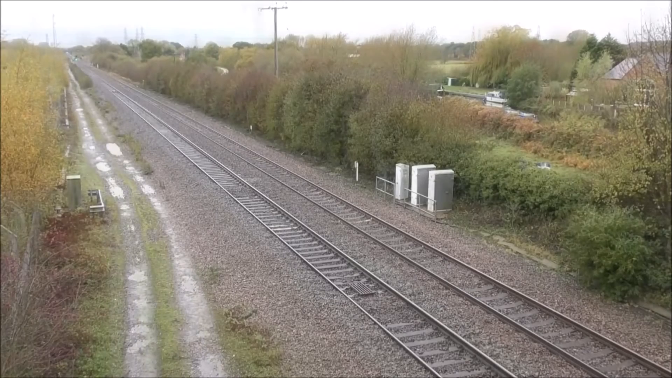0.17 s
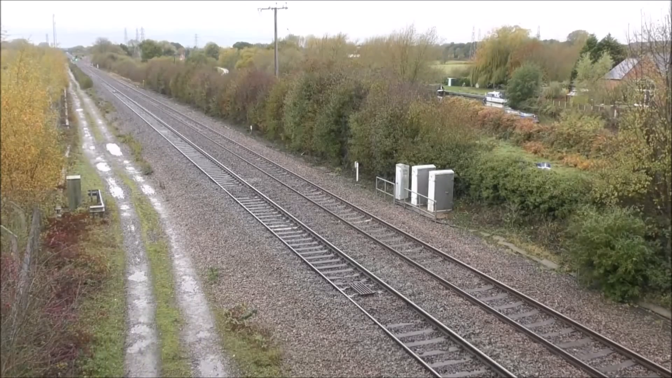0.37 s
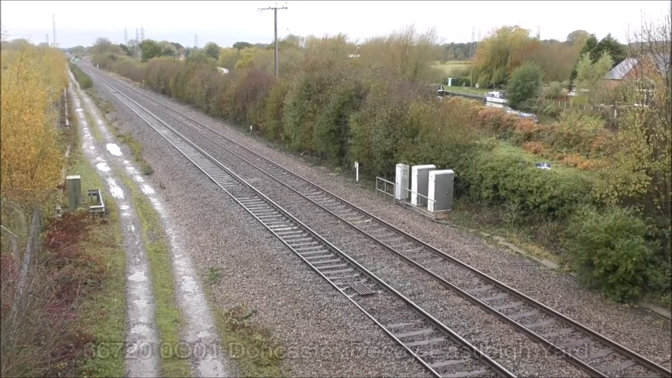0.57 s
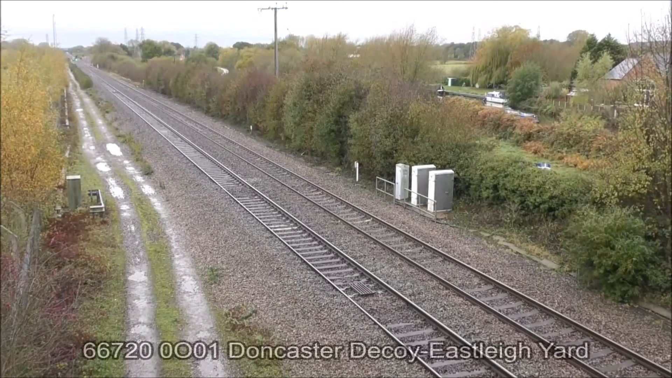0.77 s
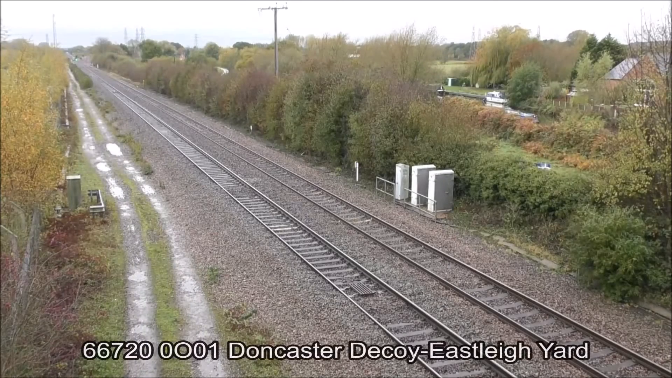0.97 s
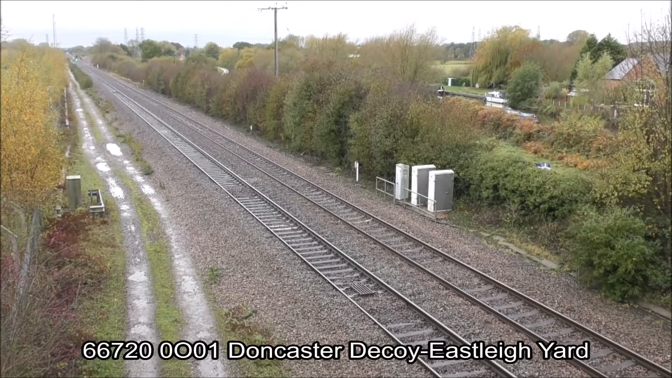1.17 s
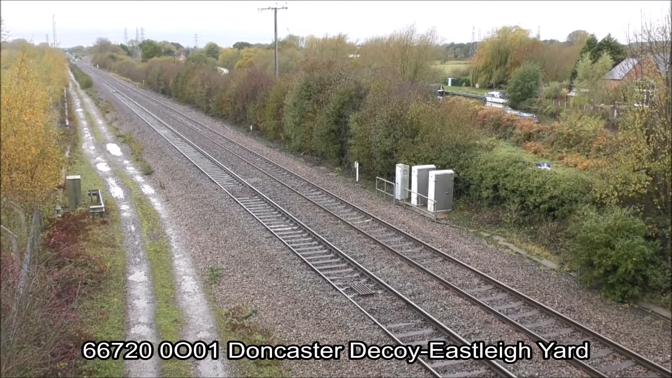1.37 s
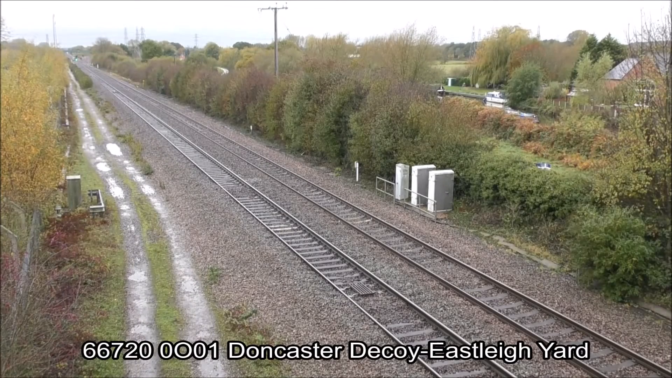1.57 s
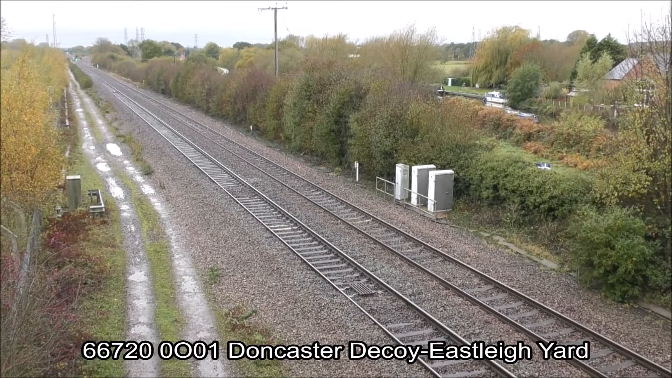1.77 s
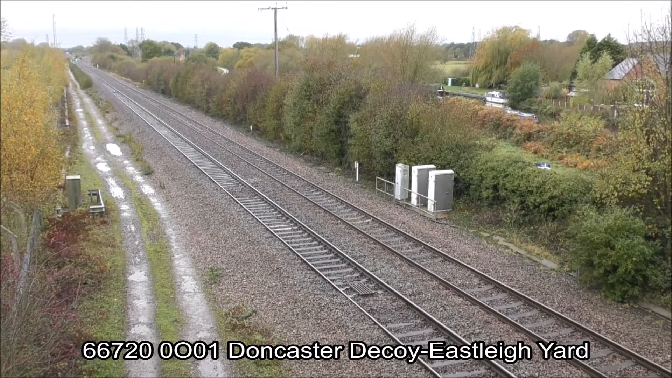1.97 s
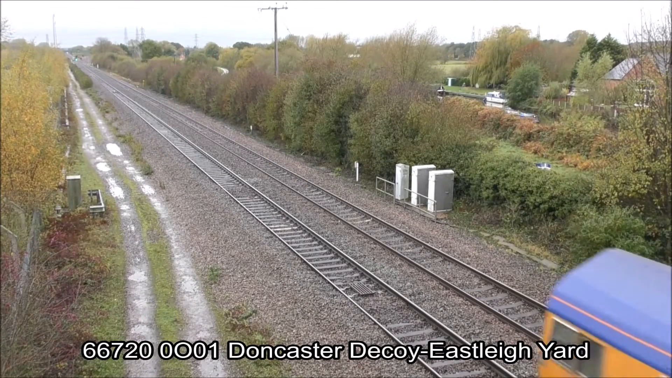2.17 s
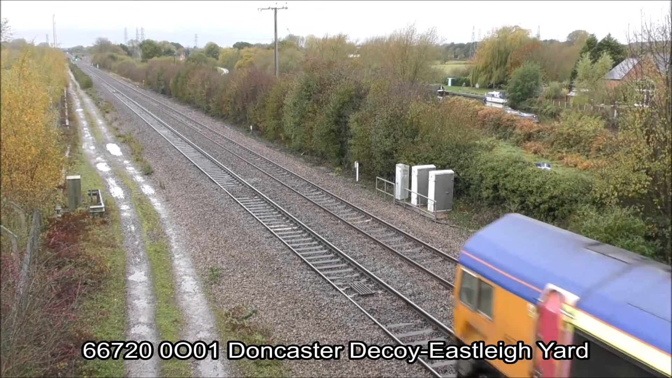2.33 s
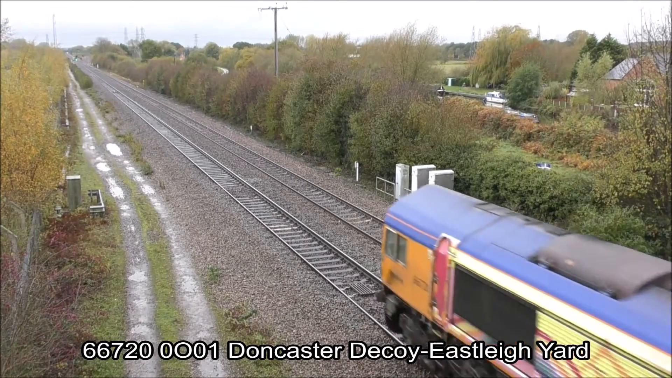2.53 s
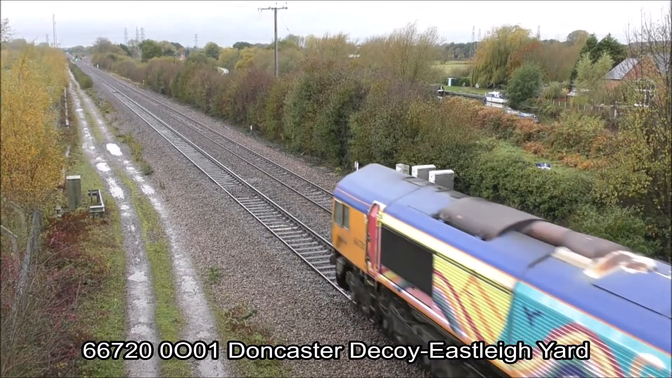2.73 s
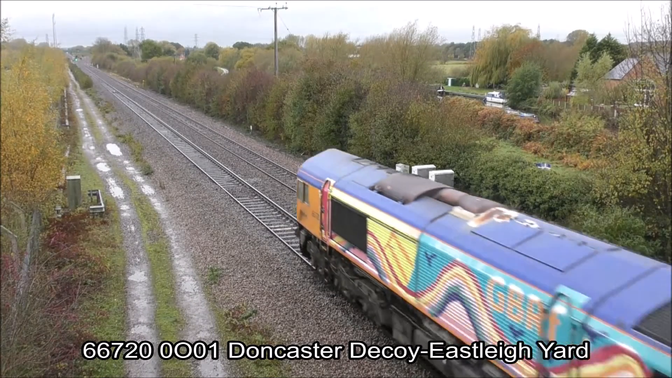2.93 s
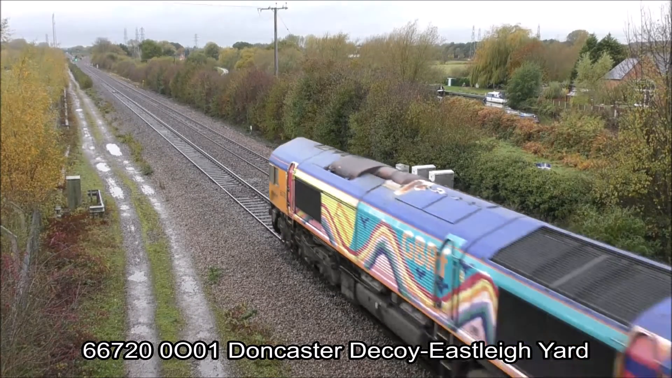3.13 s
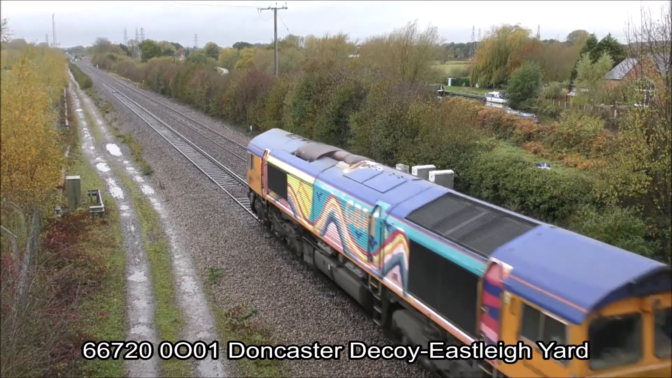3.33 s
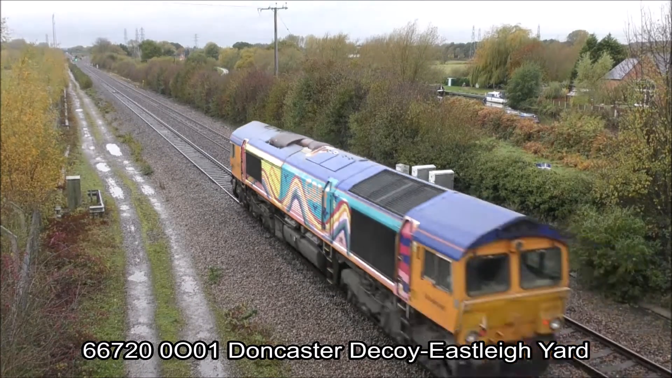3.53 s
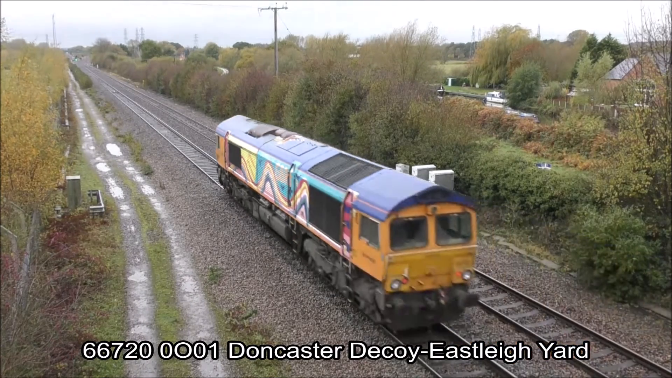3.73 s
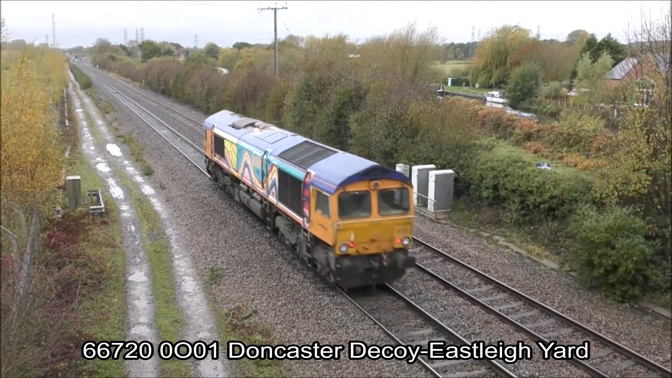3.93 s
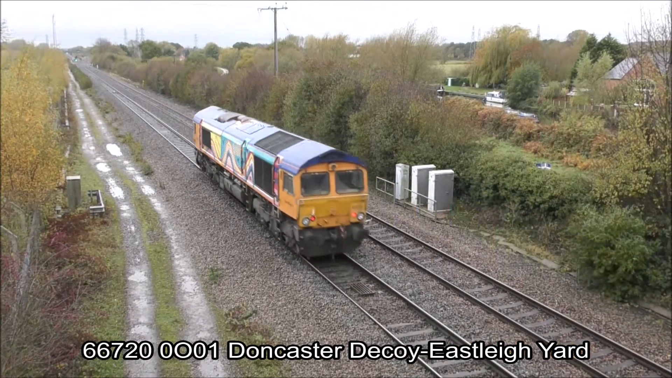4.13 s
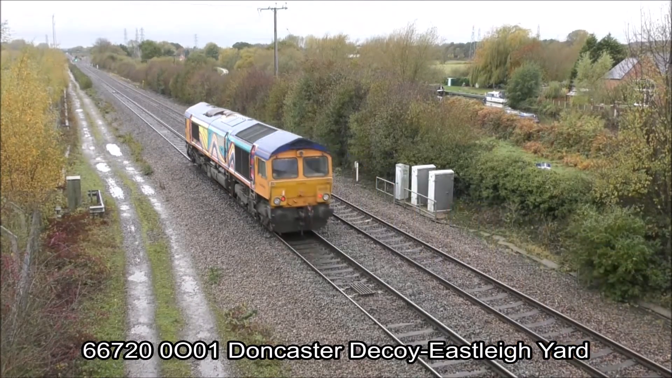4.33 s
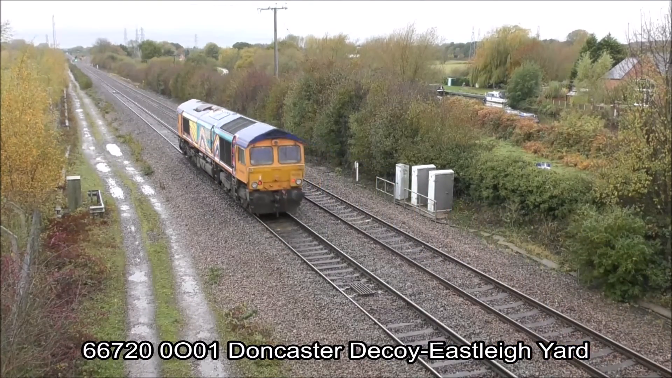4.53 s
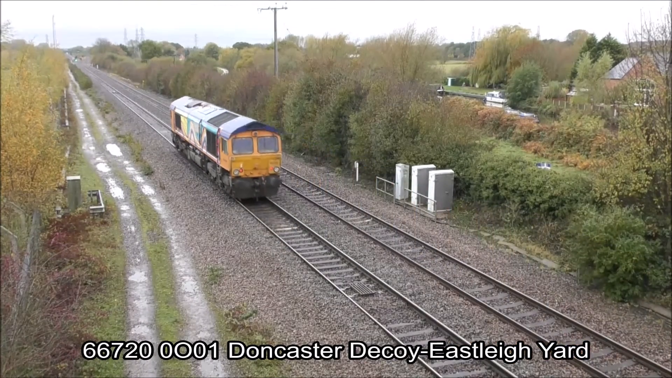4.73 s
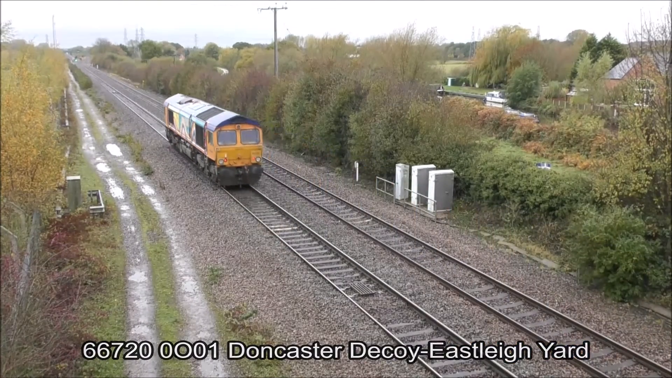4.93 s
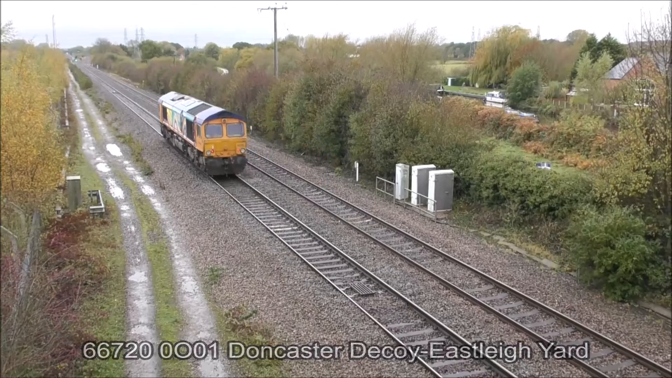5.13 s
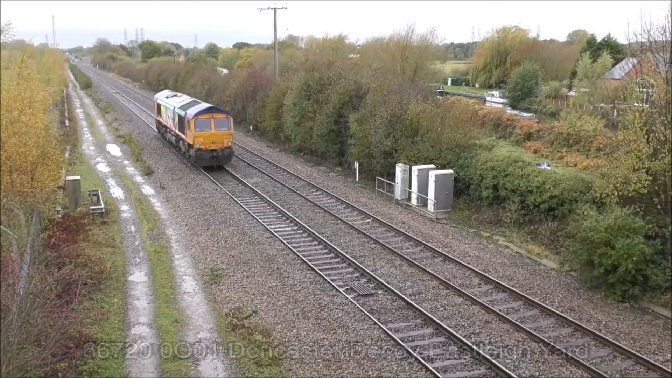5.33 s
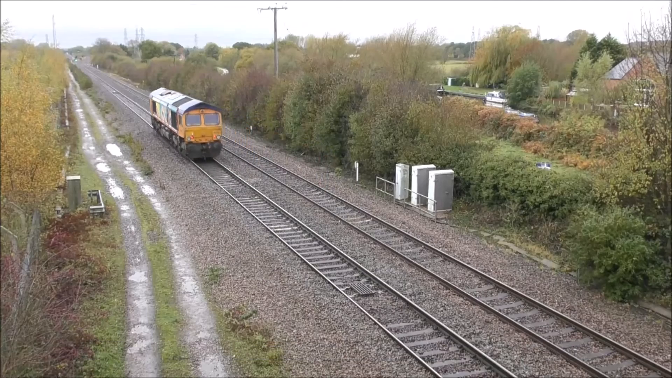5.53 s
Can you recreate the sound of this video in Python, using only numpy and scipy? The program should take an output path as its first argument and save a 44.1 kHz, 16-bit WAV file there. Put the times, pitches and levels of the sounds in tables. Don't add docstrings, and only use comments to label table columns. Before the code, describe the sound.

A quiet, muffled diesel drone grows under a bridge, with wavering metallic wheel song. The engine dips briefly, then emerges below the listener with a full rushing roar, breathy turbine hiss and broken thin blower whistle, leaning slightly right. Ringing steel flares here and there as the lone locomotive recedes across open country, its throb lower in pitch and still strong at the end; a soft gust bumps the microphone.

```python
import sys
import numpy as np
from scipy import signal
from scipy.fft import rfft, irfft, next_fast_len
from scipy.io import wavfile
from scipy.ndimage import uniform_filter1d, map_coordinates

SR = 44100
rng = np.random.default_rng(int(sys.argv[2]) if len(sys.argv) > 2 else 0)


def natural_amplitude(level_db):
    exponent = np.asarray(level_db, float) / 20
    return 10 ** exponent


def wav_out(sig):
    wavfile.write(sys.argv[1], SR, np.round(np.clip(np.atleast_2d(sig).T, -1, 1) * 32767).astype(np.int16))


N = 246519
T = np.arange(N) / SR

# [t/s, place (0 coming, 1 alongside, 2 leaving)]
PLACE = [
    (2, 0.51),
    (2.25, 0.73),
    (2.4, 0.73),
    (3.4, 1.1),
    (4.3, 2),
]
# [t/s, level/dB]
NEARNESS = [(0.0, -61.5), (0.15, -66.5), (0.3, -59.5), (0.51, -61.5), (1.38, -54), (1.73, -52), (2.07, -48),
            (2.18, -44.5), (2.61, -37.5), (3.28, -34), (4.34, -36.5), (4.87, -40.5), (5.54, -41.5),
            (5.59, -42)]
# [t/s, left minus right/dB]
BEARING = [(0.0, -1.5), (0.5, -0.5), (0.96, -1.5), (1.54, -2.5), (2.18, -2), (2.55, -4.5), (3.28, -1.5),
           (4.3, 0.5), (5.59, 0)]
# [f/Hz, left minus right/dB]
PORTS = [(60, -1.3), (200, 0), (420, .7), (1300, 0)]
# [f/Hz, share]
AIM = [(400, 0), (1000, 0.33), (2200, 0.95), (4500, 1), (6500, 0)]
# [t/s, half length/s]
BASS_GAP = (2.04, 0.04)

ORDERS_HEARD = [6, 7, 9, 10, 11, 12, 13, 14, 15, 16, 20, 21, 23, 25, 27, 29, 30, 32, 36, 40]
ORDERS_COMING = [-4, -10, 0, -13, -17, -16, -16, -24, -20, -28, -27, -29, -24, -30, -32, -30, -32, -30, -30,
                 -36]
ORDERS_ALONGSIDE = [-21, -27, 0, -17, -14, -9, -24, -5, -24, -20, -16, -15, -17, -18, -16, -22, -22, -18,
                    -22, -16]
ORDERS_LEAVING = [-15, -21, 0, -15, -12, -11, -19, -4, -16, -19, -16, -18, -20, -17, -22, -14, -13, -14,
                  -15, -16]
# [t/s middle, half length/s, level/dB]
ENGINE_SWELLS = [
    (1.42, .18, 2.5),
    (1.61, 0.038, -11),
    (1.811, 0.051, -13),
    (2.03, 0.11, -6.5),
    (2.3, 0.15, -2.5),
    (3.154, 0.38, 3),
    (4.4, 1, 4.5),
    (5.5, 0.12, 0),
]

# [f/Hz fade-in start, fade-in end, fade-out start, fade-out end]
ROAR_BANDS = [(25, 130, 360, 480), (360, 480, 2800, 3200), (2800, 3200, 6500, 8700),
              (6500, 8700, 14900, 15300)]
# [level/dB when nearest, growth/dB per dB, lead/s]
BAND_LEVELS = [(-43.5, 1.02, 0.34), (-37, 1, 0), (-48, 1.01, 0.017), (-68.5, 0.9, 0.095)]
FLICKER_DB = [2.3, .4, 0.71, .3]
COUNTRY_DB = [-65, -72, -98, -110]
ARCH_SCREEN_DB = [0, 0, 2, 4]
# [f/Hz, level/dB per Hz]
ROAR_UNDER_BRIDGE = [(15, -44), (30, -1), (80, -6.5), (136, -3.5), (340, -22), (411, -13.5), (567, -18),
                     (2430, -21.5), (3800, -30.5), (5400, -40.5), (7000, -50), (9400, -53), (13000, -57),
                     (15000, -63)]
# [f/Hz, level/dB per Hz]
ROAR_IN_OPEN = [(15, -34), (36, -22), (80, -10), (152, -10), (340, -9.5), (400, -4), (523, -12),
                (1030, -14), (1400, -11.5), (3900, -20), (5400, -32), (6600, -41), (12600, -57.5),
                (15300, -67)]
# [f/Hz, width/Hz, level/dB]
RING_UNDER_BRIDGE = [(694, 22, 6), (1018, 25, 6), (1235, 35, 6), (1650, 50, 4), (2030, 100, 4),
                     (2420, 80, 5)]
# [f/Hz, width/Hz, level/dB]
RING_IN_OPEN = [(625, 40, 5), (801, 14, 6), (909, 18, 6), (1230, 22, 7), (1405, 55, 5), (1820, 50, 4),
                (2261, 45, 5)]
# [f/Hz, likeness (1 is the same)]
ALIKE_UNDER_BRIDGE = [(60, 1), (400, 0.95), (1000, 0.9), (2500, 0.63), (5000, 0.42), (7000, 0.87)]
# [f/Hz, likeness (1 is the same)]
ALIKE_IN_OPEN = [(60, 0.9), (400, .99), (1000, .98), (2500, 0.97), (5000, 0.91), (7000, 0.99)]

# [t/s, f/Hz]
WHEEL_HZ = [(0, 420), (1.9, 420), (2.25, 407), (2.55, 402.5), (3.5, 404), (4.5, 402.7), (5.59, 404)]
# [f/Hz, width/Hz, level/dB coming, level/dB in the open], against the singing wheel
NEIGHBOURS = [(378, 12, -30, -12), (401, 8, -7, -40), (409, 5, -20, -19), (431, 9, -20, -13),
              (443, 10, -12, -16)]
# [t/s middle, half length/s, level/dB]
WHEEL_SWELLS = [(.17, 0.028, 11), (.29, 0.035, 9), (.5, 0.041, 11), (.66, 0.064, 9.5), (1.08, 0.25, 10),
                (1.42, 0.041, 11.5), (1.6, 0.094, 7), (1.93, 0.02, 11.5), (2.13, 0.19, 8.5),
                (2.37, 0.054, 10), (2.61, .12, 14), (2.86, 0.035, 6), (2.97, 0.056, 10.5),
                (3.07, 0.013, 9.5), (3.15, 0.031, 6.5), (3.34, 0.046, 12), (3.45, 0.035, 5),
                (3.56, 0.068, 9), (3.68, 0.039, 5), (3.9, 0.037, 5.5), (4.06, 0.046, 6), (4.2, 0.049, 10),
                (4.34, 0.042, 6), (4.45, 0.049, 11), (4.62, 0.069, 5), (4.8, 0.13, 10), (5.13, 0.21, 7),
                (5.3, 0.042, -9), (5.52, 0.075, 7.5)]
# [t/s middle, half length/s, f/Hz, level/dB]
FLARES = [(1, 0.18, 1026, -66.5), (1.39, 0.16, 684, -62.5), (1.497, 0.11, 990, -68),
          (2.055, 0.035, 2320, -57), (2.3, 0.15, 2287, -55.5), (2.89, 0.58, 629, -50),
          (3.11, 0.22, 1858, -49.5), (3.292, 0.26, 1444, -51), (3.81, 0.065, 786, -50),
          (4.106, 0.23, 1386, -48), (4.25, 0.099, 820, -59), (4.397, 0.36, 893, -54),
          (4.905, 0.27, 787, -54.5), (5.298, 0.42, 1233, -52)]

# [t/s middle, half length/s, level/dB]
BLOWER_SWELLS = [(2.3, 0.19, -12), (2.68, .2, 8), (2.7, .03, 6.5), (2.79, 0.048, 4.5), (3.15, 0.02, 12),
                 (3.35, .1, 11.5), (3.56, 0.085, 16), (3.94, .12, 15.5), (4.65, 0.18, 12.5), (5.35, .2, 6)]
# [t/s middle, half length/s, level/dB]
TURBINE_SWELLS = [(1.84, 0.13, 1.5), (2.17, 0.14, -10.5), (2.38, 0.04, 0.5), (2.5, .04, 4),
                  (2.79, 0.016, 5), (3.05, 0.12, 4.5), (3.68, 0.11, 3.5), (3.98, .1, -1), (4.3, 0.13, 7.5),
                  (4.7, .04, 6), (4.83, .04, 4), (5.15, 0.067, 4)]
# [t/s, level/dB against the turbine]
OCTAVE = [
    (2.25, -50),
    (2.35, -18),
    (2.8, -19),
    (3.1, -24),
    (3.2, -45),
]

# [t/s middle, level/dB, half length/s]
GUSTS = [
    (1.86, -50, 0.034),
    (3.864, -39, 0.082),
    (5.575, -51, 0.033),
]
# [f/Hz, level/dB per Hz]
BUFFET = [(20, 4), (50, 15), (110, 4), (180, 8), (300, -8), (600, -49)]
# [f/Hz, level/dB per Hz]
HISS = [(2000, 0), (9000, 0), (14000, -2), (15600, -4)]


def unit(x):
    return x / np.sqrt(np.mean(np.abs(x) ** 2) + 1e-20)


def along(points, hz):
    f, v = np.transpose(points)
    return np.interp(np.log(hz + 1), np.log(f + 1), v)


def curves(rows, t=T):
    s, *cols = np.transpose(rows)
    return [np.interp(t, s, c) for c in cols]


def wobble(rate):
    t = T[::256]
    return np.interp(T, t, map_coordinates(rng.standard_normal(400), [t * rate]))


def swells(rows):
    return sum(db * np.exp(-((T - s) / half) ** 4) for s, half, db in rows)


def bass_gap(t):
    middle_s, half_s = BASS_GAP
    return 1 - .75 * np.exp(-((t - middle_s) / half_s) ** 2)


def passing(rest_hz, abeam_s, arch_m, open_m, abeam_db, hidden_db, swell_rows):
    speed_m_s, sound_m_s = 18, 343
    ahead_m = speed_m_s * (T - abeam_s)
    side_m = np.where(ahead_m < 0, arch_m, open_m)
    range_m = np.hypot(ahead_m, side_m)
    heard_hz = rest_hz / (1 + speed_m_s / sound_m_s * ahead_m / range_m)
    level_db = abeam_db - 20 * np.log10(range_m / side_m) + hidden_db * np.minimum(T - abeam_s, 0)
    return heard_hz, level_db + swells(swell_rows)


def tone(hz, width_hz, fuzz):
    m = next_fast_len(N)
    noise = rng.standard_normal(m) + 1j * rng.standard_normal(m)
    bell = np.exp(-.5 * (2 * np.fft.fftfreq(m, 1 / SR) / width_hz) ** 2)
    smear = unit(np.fft.ifft(noise * bell)[:N])
    fuzz = np.clip(fuzz, 0, 1)
    carrier = np.exp(2j * np.pi * (np.cumsum(hz) / SR + rng.random()))
    return np.sqrt(2) * np.real(carrier * (np.sqrt(1 - fuzz) + np.sqrt(fuzz) * smear))


def coloured(spectrum):
    m = next_fast_len(N)
    gain = natural_amplitude(along(spectrum, np.fft.rfftfreq(m, 1 / SR)))
    return unit(irfft(rfft(rng.standard_normal((2, m))) * gain, m)[:, :N])


def aimed(x, hz):
    lean_db = along(PORTS, hz) + along(AIM, hz) * curves(BEARING)[0]
    return x * natural_amplitude([lean_db / 2, -lean_db / 2])


def engine():
    turns_hz, level_db = passing(rest_hz=8.12, abeam_s=2.3, arch_m=8, open_m=9,
                                 abeam_db=-33.5, hidden_db=2, swell_rows=ENGINE_SWELLS)
    place = curves(PLACE)[0]
    steady_db = uniform_filter1d(level_db, SR // 4)
    cycle = np.cumsum(turns_hz) / SR
    mid, side = 0, 0
    for order, *place_db in zip(ORDERS_HEARD, ORDERS_COMING, ORDERS_ALONGSIDE, ORDERS_LEAVING):
        order_db = level_db if order == 9 else steady_db
        gain = natural_amplitude(order_db + np.interp(place, range(3), place_db) + .1 * order * wobble(3.0))
        angle = 2 * np.pi * (order * cycle + rng.random() + .003 * order * wobble(4.0))
        mid = mid + gain * np.sin(angle)
        side = side + gain * np.cos(angle)
    side = .09 * wobble(2.0) * side
    return np.sqrt(2) * bass_gap(T) * (aimed(mid, 58) + [side, -side])


def band_levels(t):
    clears_s, clearing_s = 2.32, .025
    s, db = np.transpose(NEARNESS)
    hidden = .5 - .5 * np.tanh((t - clears_s) / clearing_s)
    levels = []
    for (top_db, grows, lead_s), screen_db, flicker_db, floor_db in zip(
            BAND_LEVELS, ARCH_SCREEN_DB, FLICKER_DB, COUNTRY_DB):
        near_db = np.interp(t + lead_s, s, db - db.max())
        train_db = top_db + grows * near_db - screen_db * hidden
        level_db = 20 * np.log10(np.hypot(natural_amplitude(floor_db), natural_amplitude(train_db)))
        levels.append(level_db + flicker_db * np.interp(t, T, wobble(9.0)))
    return levels


def roar():
    hz, t, z = signal.stft(rng.standard_normal((2, N)), SR, nperseg=2048)
    seen = np.clip(curves(PLACE, t)[0], 0, 1)

    def blend(far, near):
        return np.outer(far, 1 - seen) + np.outer(near, seen)

    def rings(rows):
        return sum(db / (1 + (2 * (hz - centre) / width) ** 2) for centre, width, db in rows)

    colour = natural_amplitude(blend(along(ROAR_UNDER_BRIDGE, hz) + rings(RING_UNDER_BRIDGE),
                       along(ROAR_IN_OPEN, hz) + rings(RING_IN_OPEN)))
    power = 0
    for (a, b, c, d), level_db in zip(ROAR_BANDS, band_levels(t)):
        rise = [a / 2, a] if a < 99 else [a, b]
        band = np.interp(hz, [*rise, c, d], [0, 1, 1, 0])[:, None] * colour ** 2
        core = (hz > b) & (hz < c)
        power = power + band / (colour[core] ** 2).sum(0) * natural_amplitude(2 * level_db)

    patches = uniform_filter1d(rng.standard_normal(colour.shape), size=14, axis=0)
    patches = uniform_filter1d(patches, size=3, axis=1)
    gain = np.sqrt(power * len(hz)) * natural_amplitude(0.61 * unit(patches))
    gain[hz < 150] *= bass_gap(t)

    likeness = blend(along(ALIKE_UNDER_BRIDGE, hz), along(ALIKE_IN_OPEN, hz))
    turn = np.arccos(np.clip(likeness, 0, 1)) / 2
    mid, side = z[0] * np.cos(turn), z[1] * np.sin(turn)
    lean_db = along(PORTS, hz)[:, None] + np.outer(along(AIM, hz), curves(BEARING, t)[0])
    pair = gain * np.array([mid + side, mid - side]) * natural_amplitude([lean_db / 2, -lean_db / 2])
    return np.sqrt(2) * signal.istft(pair, SR, nperseg=2048)[1][:, :N]


def wheels():
    level_db = curves(NEARNESS)[0] - 6.5 + swells(WHEEL_SWELLS)
    seen = np.clip(curves(PLACE)[0], 0, 1)
    slow_db = 10 * np.log10(uniform_filter1d(natural_amplitude(2 * level_db), SR // 3))
    song = natural_amplitude(level_db) * tone(curves(WHEEL_HZ)[0], width_hz=12, fuzz=.03)
    for hz, width_hz, far_db, near_db in NEIGHBOURS:
        gain = natural_amplitude(slow_db + far_db + seen * (near_db - far_db))
        song = song + gain * tone(np.full(N, hz), width_hz, fuzz=.6)
    flares = 0
    for s, half, mode_hz, db in FLARES:
        gain = natural_amplitude(db + 0.77 * wobble(7.6)) * np.exp(-((T - s) / half) ** 4)
        flares = flares + gain * np.sin(2 * np.pi * mode_hz * T + 0.4 * wobble(8.0))
    return aimed(song, 410) + aimed(np.sqrt(2) * flares, 1000)


def whistles():
    hz, level_db = passing(rest_hz=4335, abeam_s=2.37, arch_m=2.5, open_m=10.8,
                           abeam_db=-59, hidden_db=15, swell_rows=BLOWER_SWELLS)
    fuzz = np.interp(T, [2.3, 2.5, 2.9, 3.3], [1, .3, .3, .45])
    blower = natural_amplitude(level_db) * tone(hz, width_hz=70, fuzz=fuzz)

    abeam_s = 2.22
    hz, level_db = passing(rest_hz=7885, abeam_s=abeam_s, arch_m=1.5, open_m=13,
                           abeam_db=-61, hidden_db=8, swell_rows=TURBINE_SWELLS)
    smeared = tone(hz, width_hz=460, fuzz=1)
    clear = tone(hz, width_hz=280, fuzz=0.75)
    turbine = natural_amplitude(level_db) * np.where(T < abeam_s, smeared, clear)
    octave = natural_amplitude(level_db + curves(OCTAVE)[0]) * tone(2 * hz, width_hz=750, fuzz=1)
    return aimed(blower, 4200) + aimed(turbine + octave, 5800)


def gusts():
    strength = sum(natural_amplitude(db) * np.exp(-((T - s) / half) ** 2) for s, db, half in GUSTS)
    return coloured(BUFFET) * strength


def scene():
    return engine() + roar() + wheels() + whistles() + gusts()


def low_pass(x):
    return signal.sosfilt(signal.butter(12, 15680, fs=SR, output="sos"), x)


def record(dry):
    hiss = natural_amplitude(-92) * coloured(HISS)
    mix = dry + (hiss[0] + 0.57 * hiss[1] * [[1], [-1]])
    return low_pass(mix)


dry = scene()
out = record(dry)
wav_out(out)
```